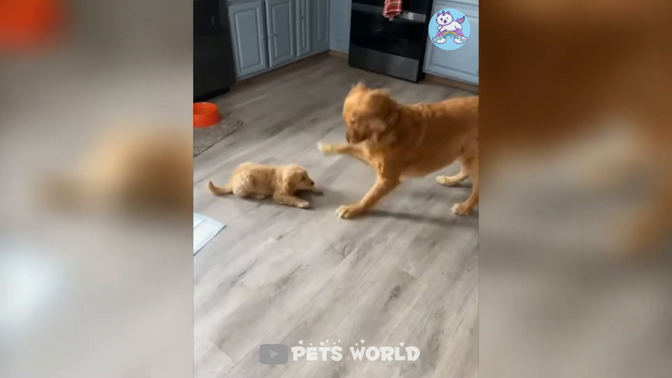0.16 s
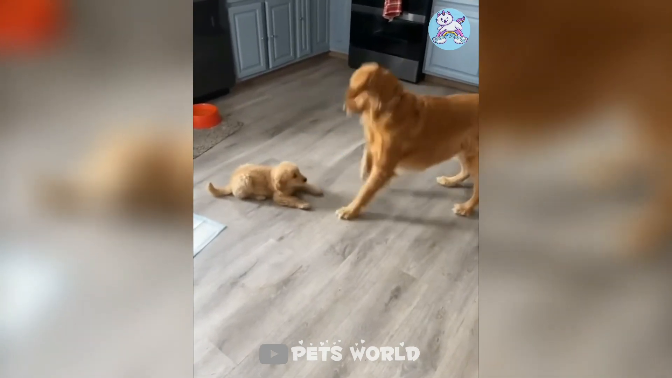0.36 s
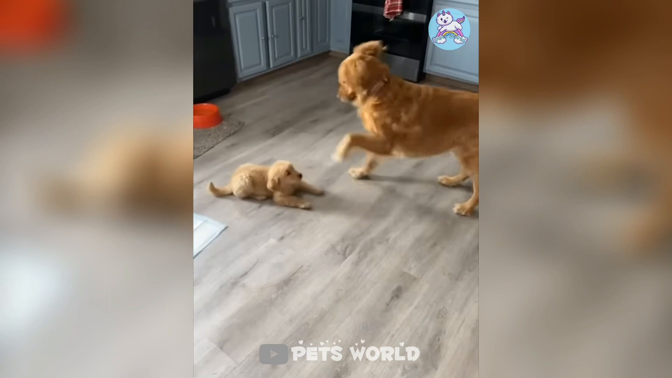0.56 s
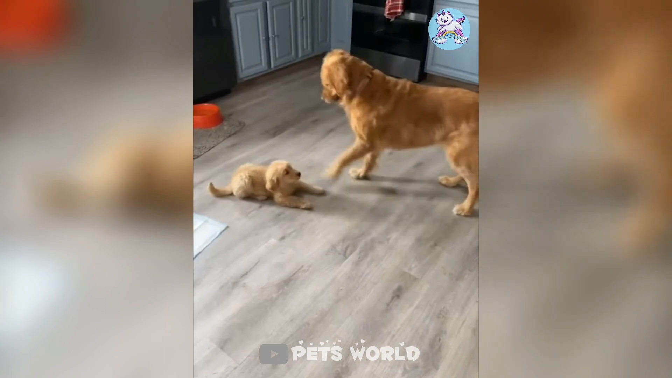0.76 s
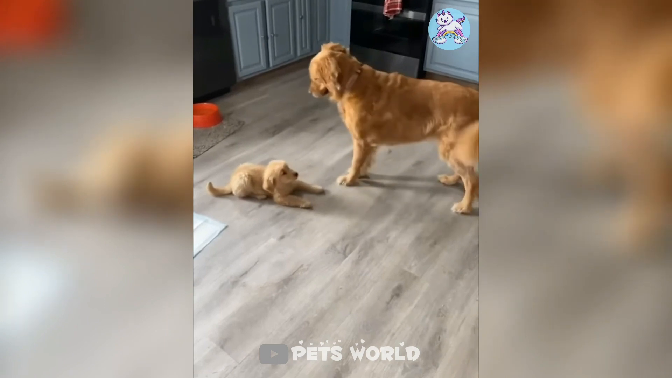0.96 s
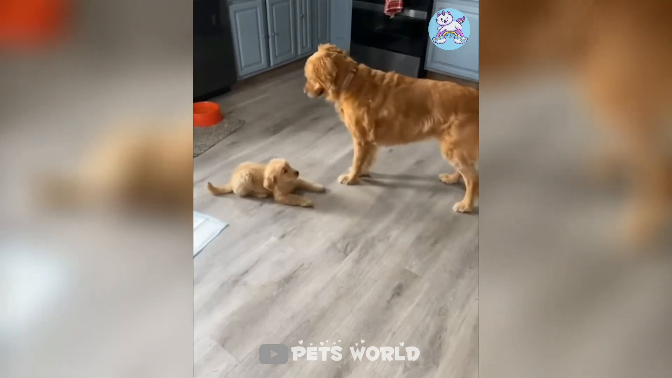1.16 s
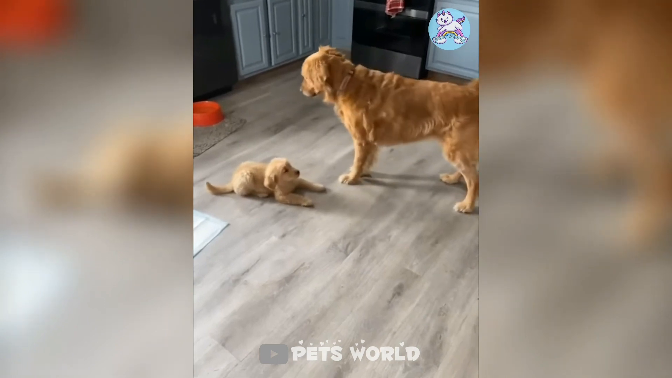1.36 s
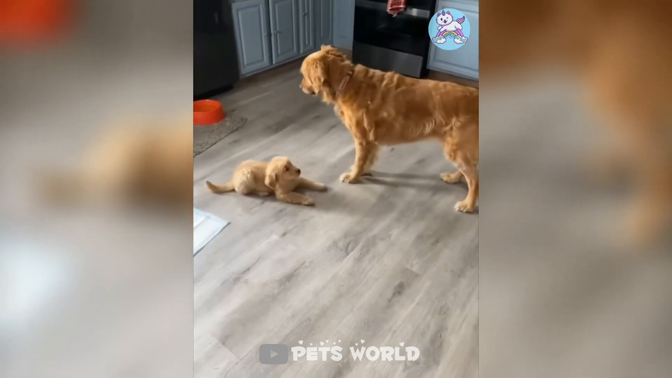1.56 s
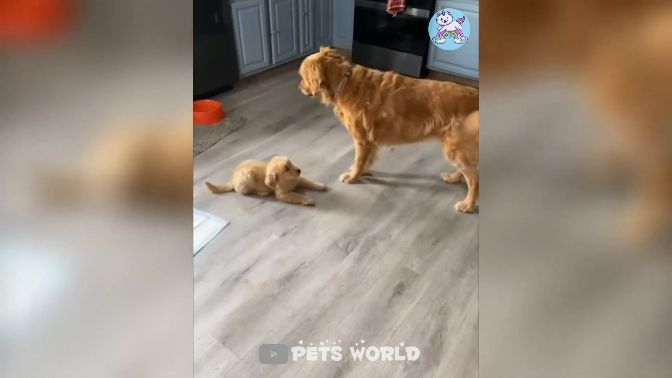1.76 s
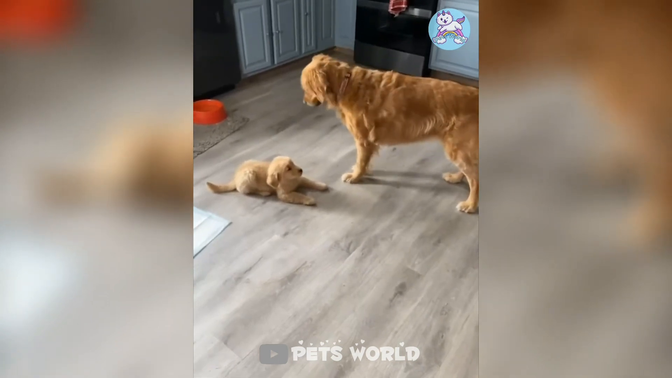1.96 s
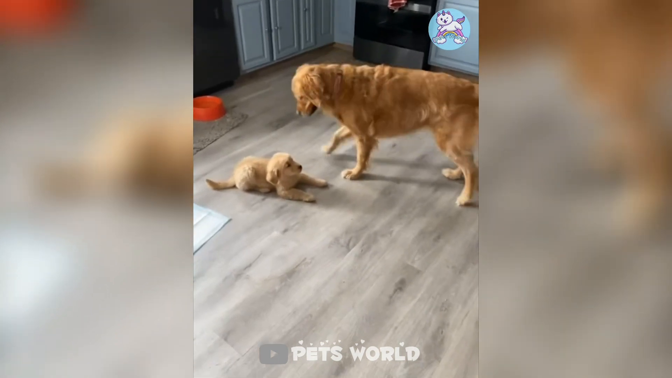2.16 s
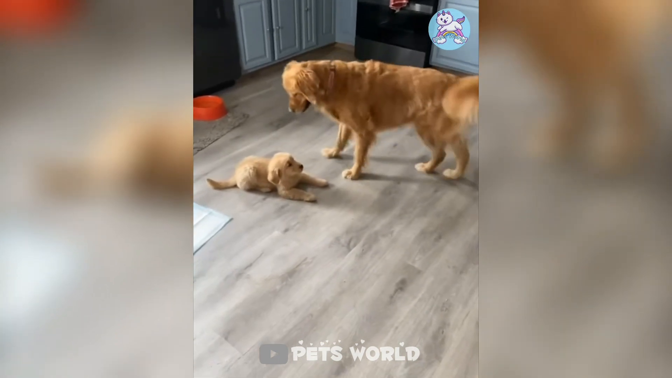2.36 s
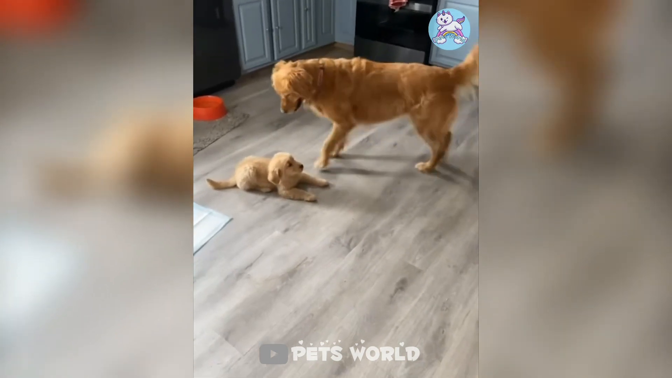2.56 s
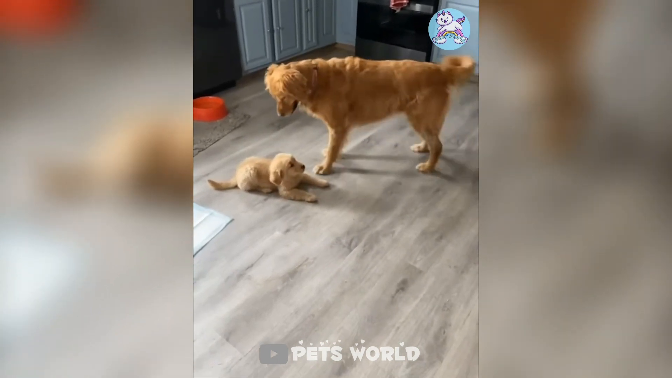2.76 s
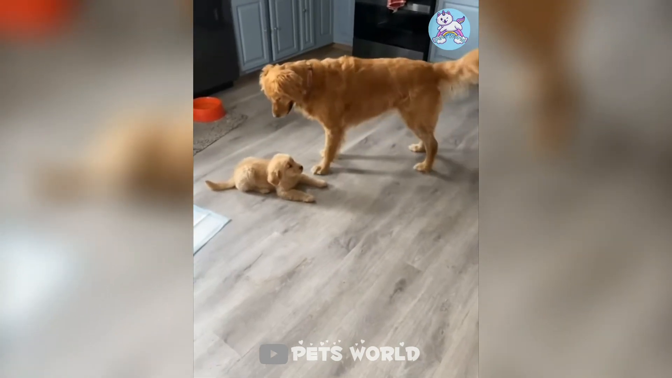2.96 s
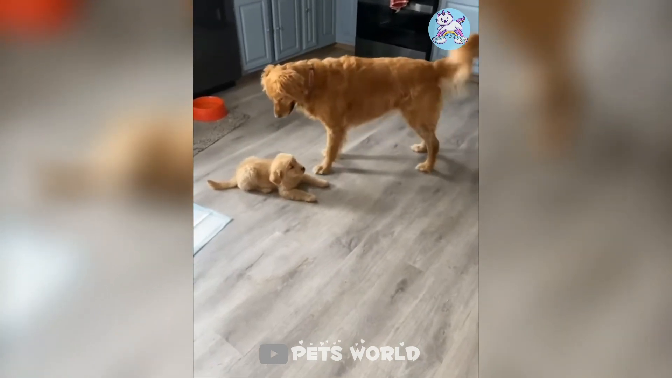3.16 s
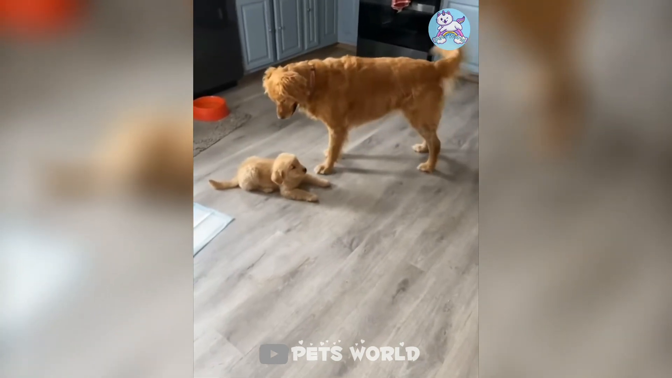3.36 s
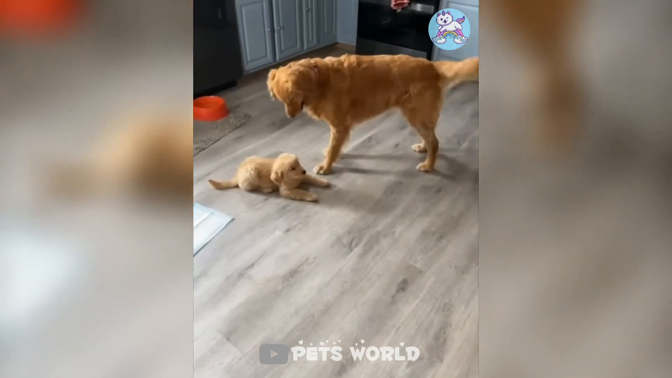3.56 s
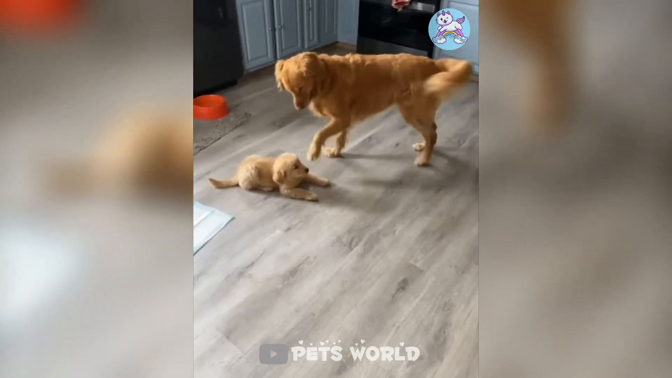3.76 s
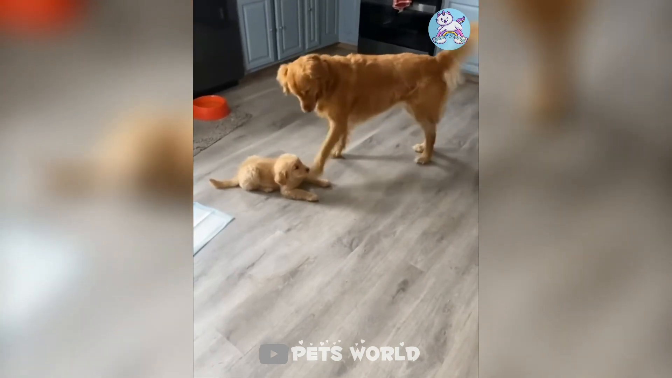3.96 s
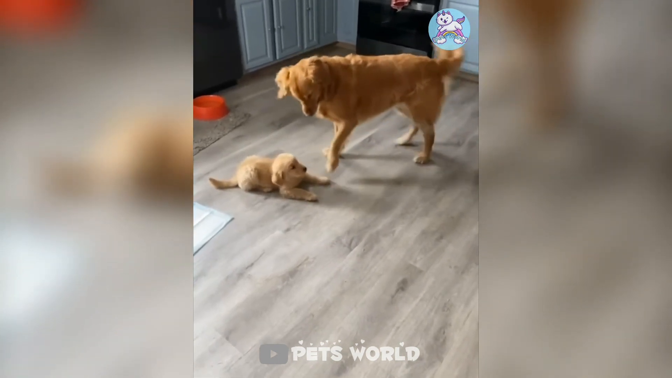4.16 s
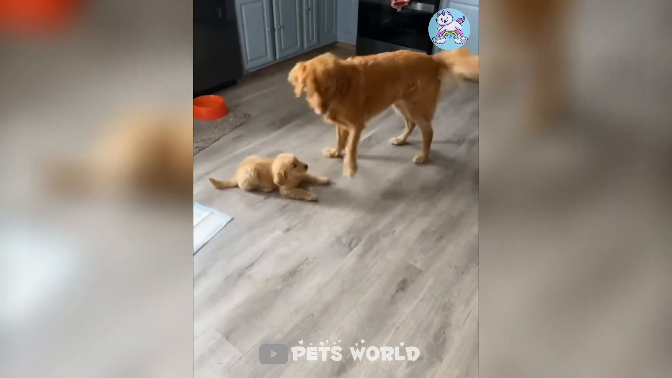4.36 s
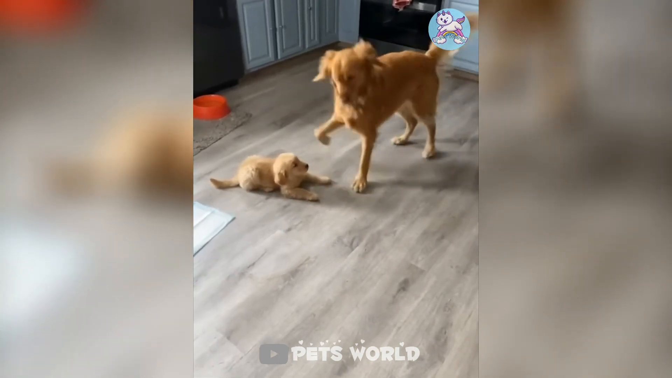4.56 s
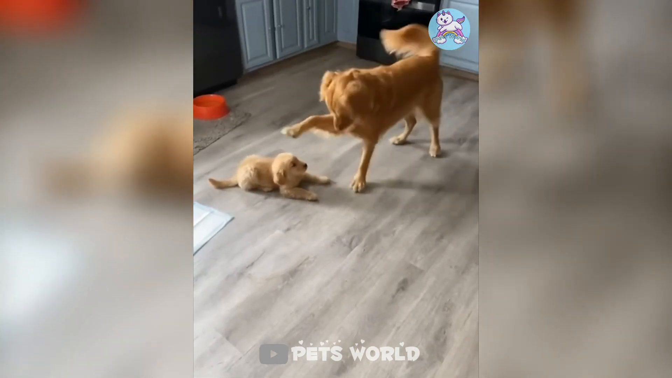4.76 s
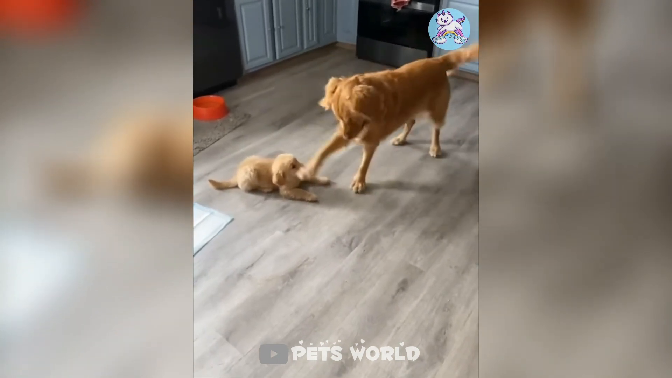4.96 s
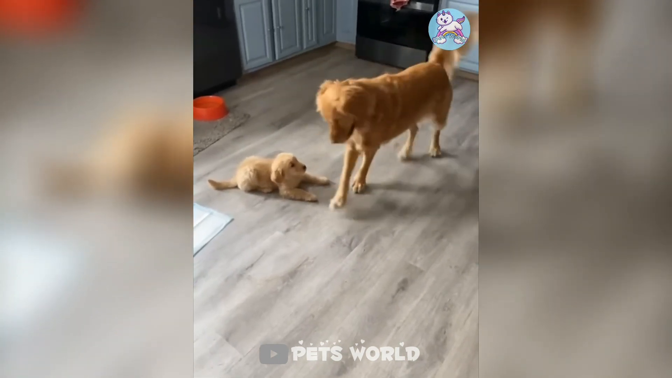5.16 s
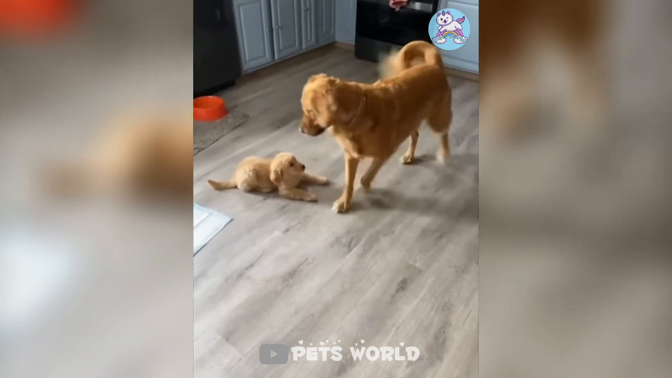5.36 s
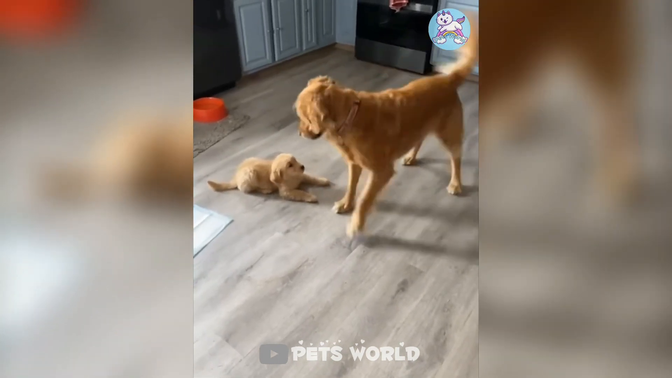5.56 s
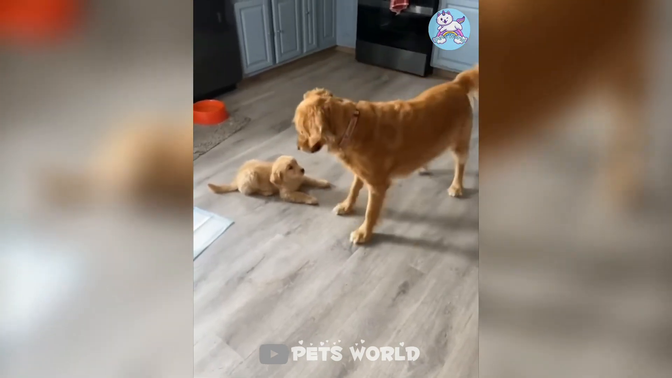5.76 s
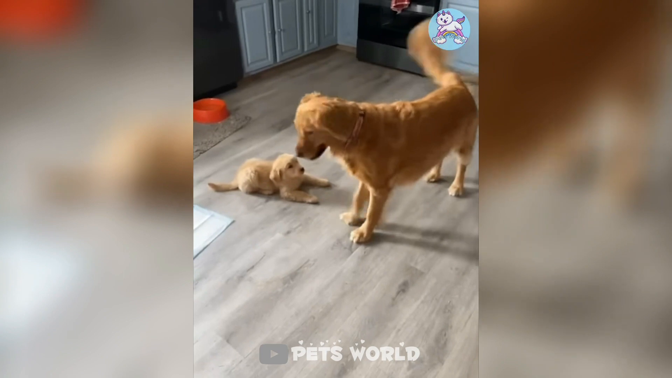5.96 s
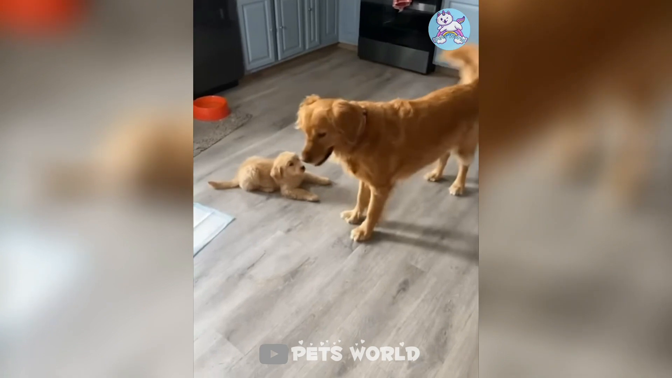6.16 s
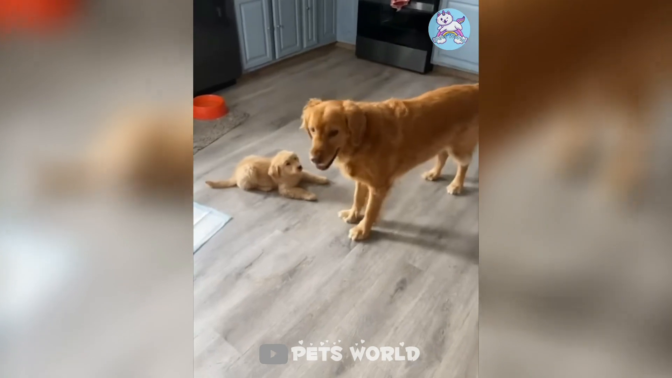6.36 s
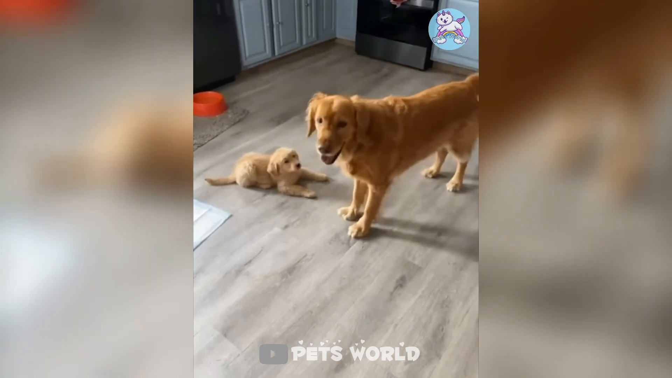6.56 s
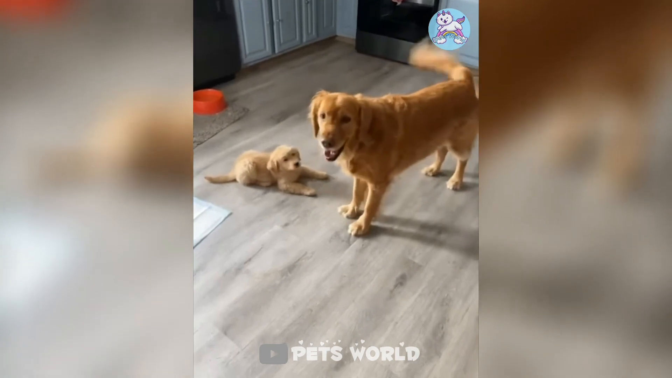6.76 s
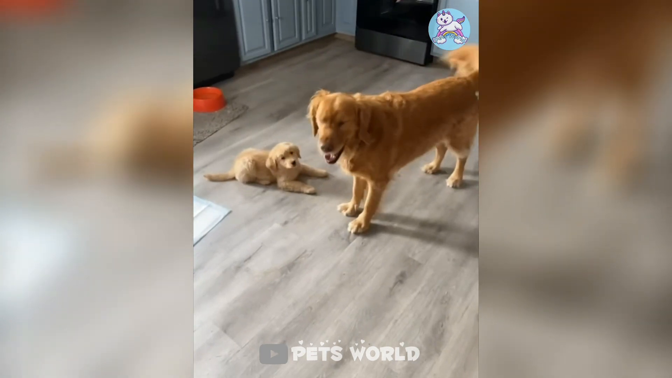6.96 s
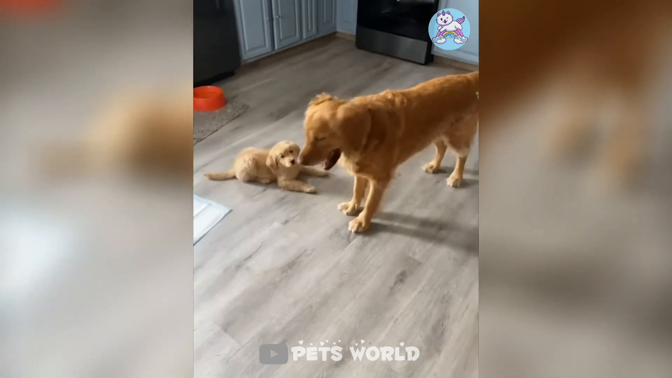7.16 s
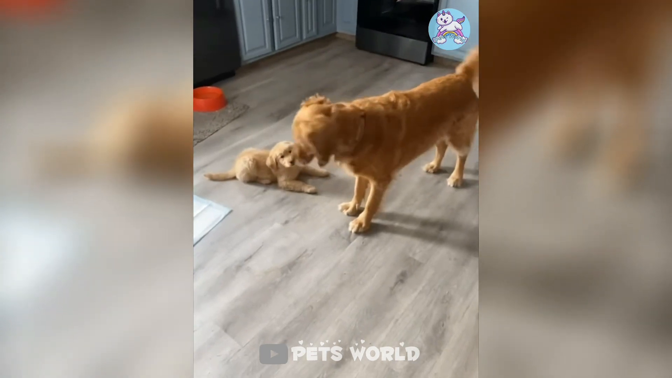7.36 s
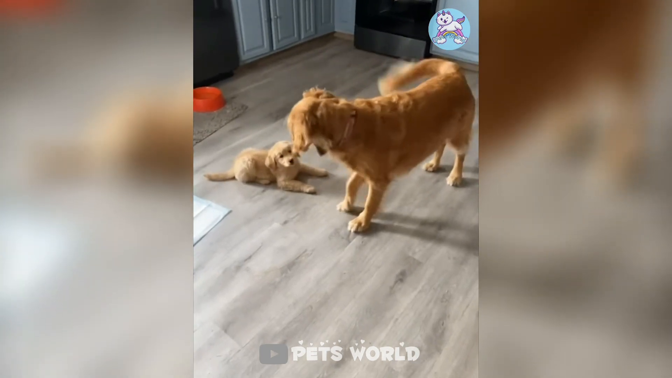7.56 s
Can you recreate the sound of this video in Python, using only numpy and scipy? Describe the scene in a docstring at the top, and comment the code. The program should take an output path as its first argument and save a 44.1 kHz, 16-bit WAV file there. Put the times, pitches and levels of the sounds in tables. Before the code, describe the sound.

Sharp claw clatters and padded thumps on hard boards, then quieter ticks, scrapes and sniffs from a playful dog in a ringing kitchen.

```python
"""Claws of a big dog clack on a laminate kitchen floor as it pounces around a puppy: bursts of tiny cracks.
Pads thump the boards (decaying modes), single claws tick, dragged paws and tags rasp (random tiny catches).
Collar tags clink (fluttering metal modes) and slap the buckle; the dog pants and sniffs (shaped noise).
The hard room rings briefly over a low appliance hum."""
import sys
import numpy as np
from scipy import signal
from scipy.fft import rfft, irfft
from scipy.io import wavfile

SR = 44100
rng = np.random.default_rng(int(sys.argv[2]) if len(sys.argv) > 2 else 0)


def int16_out(signal):
    """Quantize to a 16-bit WAV file."""
    q = np.round(np.clip(np.atleast_2d(signal).T, -1, 1) * 32767)
    wavfile.write(sys.argv[1], SR, q.astype(np.int16))


N = 336042

# spectrum of a hard crack on the floor: (frequency [Hz], level [dB])
CLACK_SPECTRUM = [(100, -28.5), (400, -13), (750, -8), (1100, -8.5), (1500, -5), (2200, -1.5), (3200, -4),
                  (5500, -4), (8700, -1.5), (11000, -10), (15000, -19)]


def amp(db):
    """Decibels to gain."""
    return 10 ** (np.asarray(db) / 20)


def evened(x):
    """Scales to rms 1."""
    return x / np.sqrt(np.mean(x ** 2) + 1e-20)


def read(points, hz):
    """Interpolates a table on a log-frequency axis."""
    f, value = np.transpose(points)
    return np.interp(np.log(hz + 1), np.log(f + 1), value)


def add(mix, s, sound):
    """Mixes a sound in at time s, cut at the ends of the mix."""
    start = round(s * SR)
    part = mix[max(start, 0):max(start + len(sound), 0)]
    part += sound[max(-start, 0):][:len(part)]


def colour(x, points, tilt_db_per_octave=0, bump_db=0, bump_hz=1700, bump_octaves=0.26, stretch=1, size=2048):
    """Minimum-phase filter: table spectrum, tilted above 1 kHz about 4 kHz, plus one broad resonance."""
    hz = abs(np.fft.fftfreq(size, 1 / SR)) + 1
    db = read(points, hz / stretch)
    db += tilt_db_per_octave * np.log2(np.maximum(hz, 1000) / 4000)
    db += bump_db * np.exp(-.5 * (np.log2(hz / bump_hz) / bump_octaves) ** 2)
    spectrum = np.exp(signal.hilbert(np.log(amp(db))).conj())
    taps = np.fft.ifft(spectrum).real
    return signal.fftconvolve(x, taps[:size // 2])


def swell(length_s, rise_share):
    """Two-sided Gaussian, its two sigmas adding up to length_s; returns the time to its peak, and the curve."""
    rise_s = length_s * rise_share
    fall_s = length_s - rise_s
    t = np.arange(-3 * rise_s, 3 * fall_s, 1 / SR)
    return -t[0], np.exp(-.5 * (t / np.where(t < 0, rise_s, fall_s)) ** 2)


def kitchen(x, room_db, outward=None, build_s=0.0018, early=1.0, early_s=0.04):
    """Direct sound x, then near echoes and a diffuse tail of what radiates outward; redrawn for each sound."""
    # decay of the room: (frequency [Hz], t60 [s])
    room_decay = [(80, .45), (210, 1), (560, 0.47), (1470, 0.42), (3880, 0.39), (8000, 0.33), (14000, 0.2)]
    # near cabinets and walls: (delay [s], share [1])
    near_echoes = [(.0027, .13), (.0056, 0.081), (.0082, .11), (0.0128, .11), (0.0146, .1)]
    t = np.arange(SR // 2) / SR
    hit = rng.random(len(t)) < .15 + t / .05  # reflections crowd together with time
    taps = rng.choice([-1., 1.], len(t)) * hit
    hz, when, z = signal.stft(taps, SR, nperseg=256)
    z /= np.sqrt(np.mean(abs(z) ** 2, 0)) + 1e-12
    decay = amp(-60 * when / read(room_decay, hz)[:, None])
    tail = signal.istft(z * decay, SR, nperseg=256)[1][:len(t)]
    tail = tail * (1 - np.exp(-t / build_s)) * (1 + early * np.exp(-t / early_s))
    tail /= np.linalg.norm(tail)
    for delay_s, share in near_echoes:
        tail[int(delay_s * rng.uniform(.85, 1.15) * SR)] += share
    out = amp(room_db) * signal.fftconvolve(x if outward is None else outward, tail)
    add(out, 0, x)
    return out / np.hypot(1, amp(room_db))  # direct sound and room share the energy


def appliances(rush_db=-54.5):
    """Steady low rush of shaped noise, with motor tones that waver as narrow bands of noise."""
    # spectrum of the rush: (frequency [Hz], relative level [dB])
    rush_spectrum = [(15, -56), (25, -20), (59, 5.5), (80, -7), (92, -7.5), (127, 0), (157, -11.5),
                     (236, -6.5), (384, -14.5), (427, -14), (911, -20), (1130, -22.5), (2050, -28),
                     (4490, -31.5), (16000, -41)]
    # motor tones: (frequency [Hz], level [dB], full width at half amplitude [Hz])
    motor_tones = [(70, -65.5, 3.4), (118, -77.5, 4), (235.2, -64.5, 2.4), (1193, -78, 28),
                   (3454, -78, 12.26), (4440, -78, 120)]
    hz = np.fft.rfftfreq(N, 1 / SR)
    rush = evened(irfft(rfft(rng.standard_normal(N)) * amp(read(rush_spectrum, hz)), N))
    noise = rfft(rng.standard_normal(N))
    tones = np.zeros(N)
    for tone_hz, db, width_hz in motor_tones:
        band = noise / (1 + (2 * (hz - tone_hz) / width_hz) ** 2)
        tones += amp(db) * evened(irfft(band, N))
    return amp(rush_db) * rush + tones


def tags(room_db=-5, octaves=0.59, chatter=.3, chatter_s=.014, fur_s=.14, swing=0.83):
    """Thin metal tags knock together and chatter briefly; each mode flutters as the tags swing and turn."""
    # clinks: (time [s], level [dB], frequency around which the blow rings most [Hz])
    clinks = [(0.0, -45, 12200), (.793, -43.5, 3860), (0.806, -40, 11900), (4.641, -43.5, 11500),
              (4.683, -38, 10700), (4.703, -49, 7300)]
    # modes of the tags: (frequency [Hz], level [dB], t60 [s])
    tag_modes = [(1900, 3, .1), (2503, -1, 0.14), (3300, -5, 0.079), (4240, -10, 0.15), (4420, -6, 0.23),
                 (6020, -7, 0.62), (6330, -8.5, .25), (8040, -11, 0.028), (8920, -15, 0.11),
                 (10030, 0.5, 0.084), (10070, -11.5, 0.17), (13840, -13, .13), (13950, -18, .1)]
    out, t = np.zeros(N), np.arange(SR // 3) / SR
    hz, mode_db, t60_s = np.transpose(tag_modes)[:, :, None]
    for s, db, middle_hz in clinks:
        weight = amp(mode_db) * np.exp(-.5 * (np.log2(hz / middle_hz) / octaves) ** 2)
        knocks = rng.standard_normal(len(t)) * (rng.random(len(t)) < 2000 / SR)  # 2000 per s
        contacts = (t == 0) + chatter * knocks * np.exp(-t / chatter_s)
        modes = np.sin(2 * np.pi * hz * t) * np.exp(-np.log(1000) * t / t60_s)
        rung = signal.fftconvolve(contacts[None], modes, axes=1)[:, :len(t)]
        # each mode keeps its share
        rung *= np.linalg.norm(modes, axis=1, keepdims=True) / np.linalg.norm(rung, axis=1, keepdims=True)
        swing_hz = rng.uniform(17, 29.92, hz.shape)
        flutter = 1 + swing * np.sin(2 * np.pi * (swing_hz * t + rng.random(hz.shape)))
        damping = np.exp(-(t / fur_s) ** 2)  # the tags fall back against the fur
        jingle = kitchen((weight * flutter * rung).sum(0) * damping, room_db)
        # level as if it all sounded within 40 ms
        add(out, s, amp(db) * jingle / np.linalg.norm(jingle) * np.sqrt(SR // 25))
    return out


def rasps(rise_share=.46, grain_db=4, catches_per_s=4000, room_db=1, hollow_db=3.0, hollow_hz=1800):
    """Rasps of many tiny catches: dragged paws, and bright rattles of the tags at 0.017 and 4.641 s."""
    # rasps: (time of the peak [s], length [s], level [dB], brightness [dB/octave])
    bursts = [(0.017, 0.018, -47.5, 5), (0.388, 0.034, -31.5, 4), (0.585, 0.079, -50, -1),
              (2.046, .045, -59, -0.5), (2.261, .021, -41.5, 0.5), (2.446, .031, -45.5, 2),
              (2.525, .018, -48, -3.5), (2.607, .026, -39.5, 1.5), (2.758, 0.021, -38, 1.5),
              (3.839, 0.025, -40, .5), (3.872, 0.044, -43.5, 0.5), (4.17, 0.02, -37, 3.5),
              (4.301, 0.056, -51.5, -2), (4.641, 0.056, -47, 5), (5.160, .022, -47, -1.5),
              (5.337, .025, -45, 5), (5.411, 0.022, -42.5, 1), (5.444, .024, -36.5, 3.5),
              (5.795, .025, -44.5, -.5), (5.92, 0.018, -40, 1.5), (6.046, 0.024, -39.5, 3)]
    # spectrum of the rasp: (frequency [Hz], level [dB])
    rasp_spectrum = [(150, -12.5), (600, -4.5), (1200, 0.5), (2100, 2), (4000, 2), (6500, -2.5), (9000, -2),
                     (11500, -16), (15000, -19.5)]
    out = np.zeros(N)
    for s, length_s, db, tilt in bursts:
        lead_s, envelope = swell(length_s, rise_share)
        size, chance, sign = rng.random((SR // 2, 3))[:len(envelope)].T
        signs = (chance < catches_per_s / SR) * np.sign(sign - .5)
        catches = amp(grain_db * np.minimum(-np.log(size), 4)) * signs
        rasp = evened(colour(catches, rasp_spectrum, tilt, hollow_db, hollow_hz)[:len(envelope)])
        add(out, s - lead_s, amp(db) * kitchen(rasp * envelope, room_db))
    return out


def claws(next_claw=0.73, grit=0.045, smear=.4, knock_octaves=.37, count=4):
    """The claws of a paw strike one just after another, each a tiny crack; the first has a gritty edge."""
    # landings: (time [s], energy [dB], spread, two claw intervals [s], brightness [dB/octave],
    # knock of the board [dB], knock frequency [Hz])
    landings = [(.1240, 12, .0023, 1, 5, 1110), (.3373, 13, 0.0028, 1.96, 5, 678),
                (.6246, 10.5, .0024, 2.5, 9, 820), (.8944, -1.5, .0011, 2, 8.5, 1070),
                (2.3157, -9, 0.00061, 0, 1.5, 1800), (2.6926, -5, 0.0019, 0.5, -0.5, 2200),
                (4.2588, -18, 0.0018, .5, 6, 2000), (4.5505, 8.5, 0.00052, 0.2, -7.5, 1210),
                (5.2778, -4.5, 0.00053, 1.5, 3.5, 2500), (5.2845, -6.5, 0.00097, 0, -3, 2000),
                (5.3135, -3.5, .0014, 0.9, 4.5, 1300), (5.678, -3, .0006, -3, 4.5, 2600),
                (5.6969, -9, 0.0012, 2.5, 8, 2000), (5.9091, -12, 0.0024, 0, 14, 1860),
                (6.0276, -9, 0.00122, -1, 8, 900)]
    out, t = np.zeros(N), np.arange(SR // 40) / SR
    first = 1. * (t == 0)
    for s, db, spread_s, tilt, knock_db, knock_hz in landings:
        room_db = 1.3 + 2 * np.log2(spread_s / .001)  # a longer landing feeds the room more
        rest = grit * np.exp(-t / spread_s) * rng.standard_normal(len(t))
        for k in range(1, count):
            delay_s = spread_s * (k + rng.uniform(-0.33, .4)) / 2
            add(rest, delay_s, np.array([rng.choice([-1, 1]) * next_claw ** k]))
        # over all directions the single claws partly merge, so the room is fed a more even clack
        knock = (CLACK_SPECTRUM, tilt, knock_db, knock_hz, knock_octaves)
        crack = colour(first + rest, *knock)
        outward = colour(first + smear * rest, *knock)
        clack = kitchen(crack / np.linalg.norm(crack), room_db, outward / np.linalg.norm(outward))
        add(out, s, amp(db) * clack)
    return out


def pads(rise_s=0.0053, octaves=0.99, rumble=0.53):
    """Weight on the pads rings the boards' modes, most strongly those near the middle of the blow."""
    # blows: (time [s], relative level [dB], middle of the blow [Hz])
    blows = [(.126, -21, 150), (.150, -31.5, 61.9), (.340, -31, 198), (.629, -22, 173), (.900, -45, 80),
             (2.316, -43, 184), (2.694, -44, 70), (3.861, -48, 75), (4.101, -34.5, 97.7),
             (4.353, -42.5, 55), (4.554, -28, 172), (5.132, -44, 70), (5.280, -36.5, 140),
             (5.330, -38.5, 88), (5.679, -35, 87), (6.320, -44, 60), (6.420, -45, 65), (6.779, -47.5, 60.6)]
    # modes of the floor boards: (nominal frequency [Hz], level [dB], t60 [s])
    board_modes = [(47.66, -2, 0.97), (65.7, 0, 0.29), (118, -3, 0.24), (145.9, -9, 0.3), (171.7, -1, 0.28),
                   (203.6, -1.5, 0.13), (258, -8, 0.16), (317.2, -5.5, 0.24), (381.5, -11.5, 0.21),
                   (489, -9, 0.21)]
    out, t = np.zeros(N), np.arange(SR // 2) / SR
    hz, mode_db, t60_s = np.transpose(board_modes)[:, :, None]
    slow = signal.butter(2, 30, fs=SR, output="sos")
    for s, db, middle_hz in blows:
        weight = amp(mode_db) * np.exp(-.5 * (np.log2(hz / middle_hz) / octaves) ** 2)
        turns = hz * rng.uniform(1.0, 1.05, hz.shape) * t + rng.random(hz.shape)
        scatter = evened(signal.sosfilt(slow, rng.standard_normal(turns.shape)))
        waves = np.sin(2 * np.pi * turns) + rumble * scatter * np.cos(2 * np.pi * turns)
        modes = weight * waves * np.exp(-np.log(1000) * t / t60_s)
        thump = modes.sum(0) / np.linalg.norm(weight) * (1 - np.exp(-t / rise_s))
        add(out, s, amp(db) * 1.306 * thump)
    return out


def buckle(slap_s=0.0011, rattle=.19, rattle_s=0.018, tilt=3.0, ring_db=5, ring_hz=2000, room_db=-2.5):
    """When the dog jerks its head, the tags slap the buckle with a dry click and a short rattle."""
    # slaps: (time [s], energy [dB])
    slaps = [(0.7932, -5.5), (4.683, -5)]
    out, t = np.zeros(N), np.arange(SR // 8) / SR
    for s, db in slaps:
        decay = np.exp(-t / slap_s) + rattle * np.exp(-t / rattle_s)
        contacts = rng.standard_normal(len(t)) * decay
        click = colour(contacts, CLACK_SPECTRUM, tilt, ring_db, ring_hz)
        add(out, s, amp(db) * kitchen(click / np.linalg.norm(click), room_db))
    return out


def huffs(rise_share=.47, room_db=2):
    """The dog's air hisses and half whistles through its nose, or flows lower and wider through the open mouth."""
    # sniffs and pants: (time of the peak [s], length [s], level [dB])
    breaths = [(1.621, 0.096, -62), (2.122, .14, -56), (3.576, 0.08, -50.5), (3.70, 0.13, -45.5),
               (4.329, .17, -55.5), (4.446, 0.074, -51.5), (5.129, .1, -48), (5.209, .06, -51.5),
               (5.598, 0.026, -51), (5.872, 0.096, -53.5), (6.047, 0.039, -51), (6.241, 0.091, -60),
               (6.459, .065, -57), (6.636, 0.035, -48), (6.82, 0.072, -67.5), (7.05, 0.17, -60.5),
               (7.279, .065, -54), (7.511, 0.088, -60)]
    # the dog pants, sniffs with its mouth nearly shut, then pants again: (time [s], mouth opening [0-1])
    mouth_opening = [(1.62, 1), (2.12, 0.84), (3.56, 0.01), (3.7, 0.03), (4.33, 0.11), (5.12, .29),
                     (5.6, 0.6), (6.05, .95)]
    # spectrum of the nose, mouth shut: (frequency [Hz], level [dB])
    nose_spectrum = [(200, -7), (900, -15), (1400, -2.5), (1650, -3), (1930, 4), (2200, -9.5), (2550, -0.5),
                     (3400, -10), (4400, -9), (5500, -13.5), (8500, -17.5), (13000, -33)]
    # spectrum of the open mouth: (frequency [Hz], level [dB])
    mouth_spectrum = [(150, -1), (450, 6.5), (800, 3), (1150, 3.5), (1500, -4.5), (2000, 1.5), (2650, -8.5),
                      (3300, -31), (5500, -26), (10000, -63)]
    nostril_hz, nostril_width_hz = 1900, 70  # narrow, breathy whistle with the mouth shut
    out = np.zeros(N)
    for s, length_s, db in breaths:
        lead_s, flow = swell(length_s, rise_share)
        opening = np.interp(s, *np.transpose(mouth_opening))
        lift = 2 ** (1.04 * min(opening, 0.287))  # nasal resonances rise as the mouth opens, up to a limit
        jets = rng.standard_normal((3, SR))
        hiss = evened(colour(jets[0], nose_spectrum, stretch=lift)[:len(flow)])
        nostril = signal.iirpeak(nostril_hz * lift, nostril_hz / nostril_width_hz, fs=SR)
        whistle = evened(signal.lfilter(*nostril, jets[1])[:len(flow)])
        nose = evened(hiss + amp(db + 41.5) * whistle)  # equals the hiss at -41.5 dB, weaker below
        pant_tilt = 0.5 * (db + 56)  # dB/octave: stronger pants are brighter
        mouth = evened(colour(jets[2], mouth_spectrum, pant_tilt)[:len(flow)])
        air = np.sqrt(1 - opening) * nose + np.sqrt(opening) * mouth
        add(out, s - lead_s, amp(db) * kitchen(air * flow, room_db))
    return out


def ticks(grit=0.14, grit_s=0.0008, room_db=-3):
    """One claw tip touches the floor: a thin dry crack without a board knock."""
    # touches: (time [s], energy [dB], brightness [dB/octave])
    touches = [(2.5708, -16.5, 5), (2.8990, -26.5, -5), (3.6934, -17.5, 9), (4.5205, -21.5, 5),
               (5.1572, -24.5, 0), (5.324, -13.5, 6), (5.426, -11, 17)]
    out, t = np.zeros(N), np.arange(SR // 40) / SR
    for s, db, tilt in touches:
        contact = (t == 0) + grit * np.exp(-t / grit_s) * rng.standard_normal(len(t))
        crack = colour(contact, CLACK_SPECTRUM, tilt)
        add(out, s, amp(db) * kitchen(crack / np.linalg.norm(crack), room_db))
    return out


def scene():
    """Sum of all sources, one channel."""
    return (claws() + ticks() + pads() + rasps() + tags() + buckle() + huffs() + appliances())[None]


def record(dry, edge_hz=15900):
    """The recorder's band limit: a linear-phase low-pass."""
    taps = signal.firwin(255, edge_hz, window=("kaiser", 8), fs=SR)
    return signal.oaconvolve(dry, taps[None], "same")


dry = scene()
out = record(dry)
int16_out(out)
```